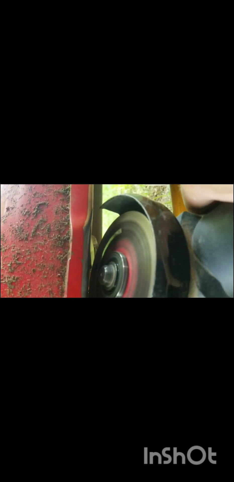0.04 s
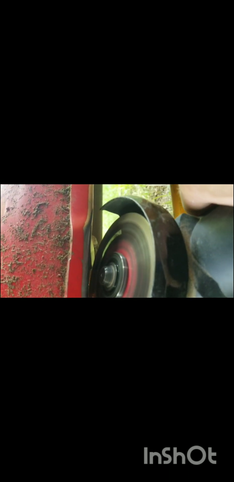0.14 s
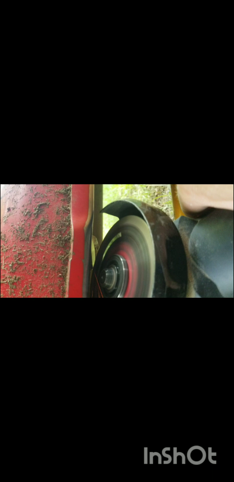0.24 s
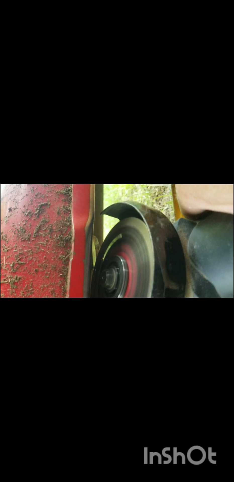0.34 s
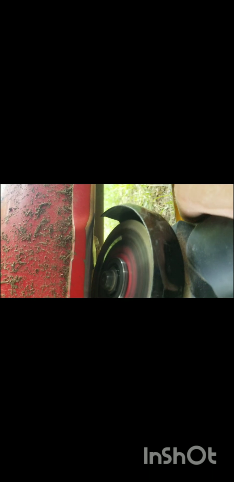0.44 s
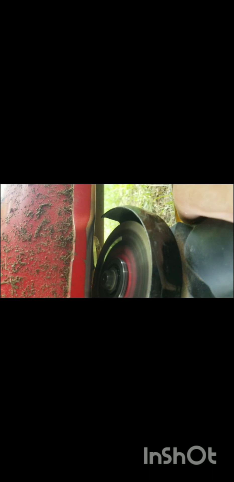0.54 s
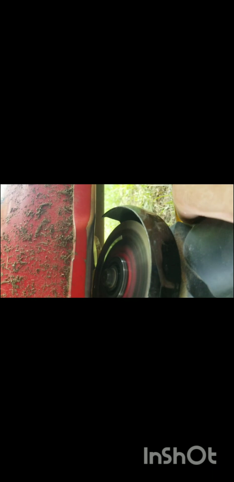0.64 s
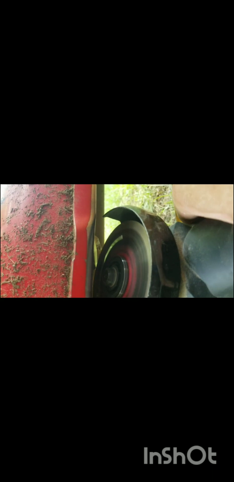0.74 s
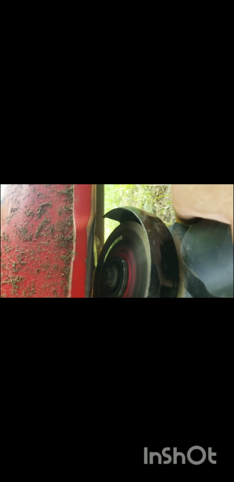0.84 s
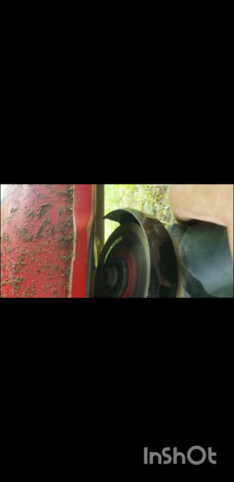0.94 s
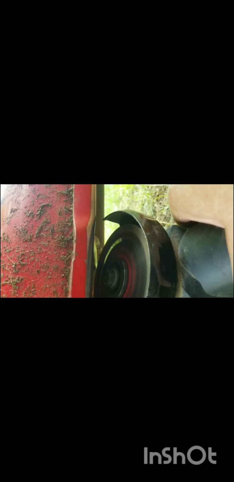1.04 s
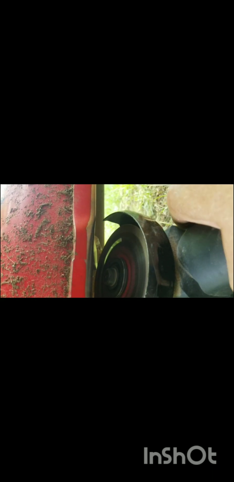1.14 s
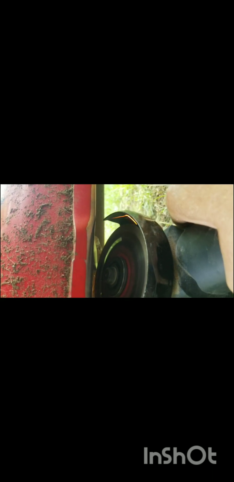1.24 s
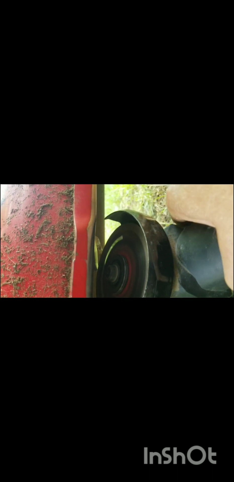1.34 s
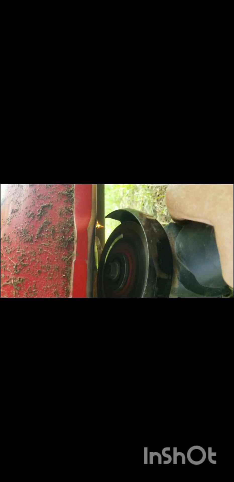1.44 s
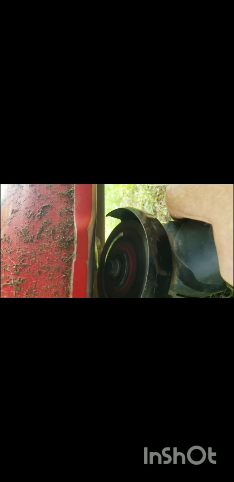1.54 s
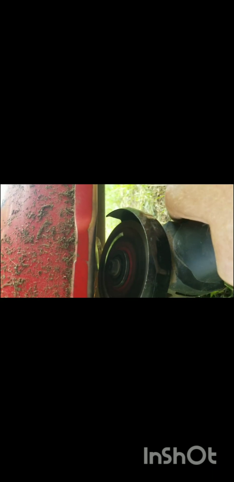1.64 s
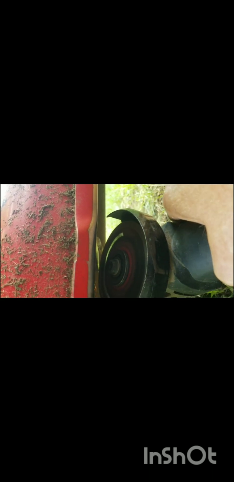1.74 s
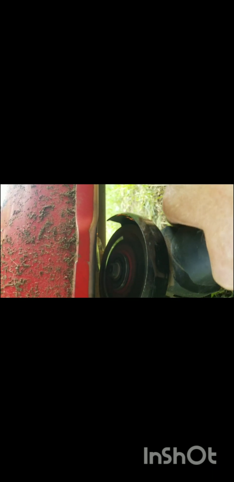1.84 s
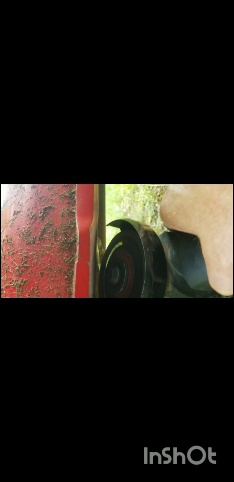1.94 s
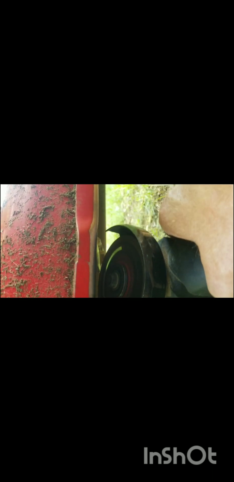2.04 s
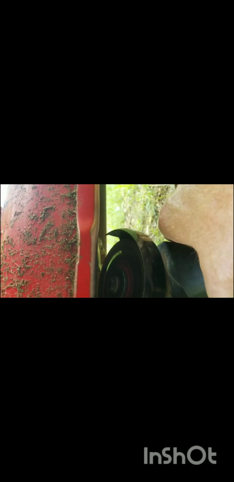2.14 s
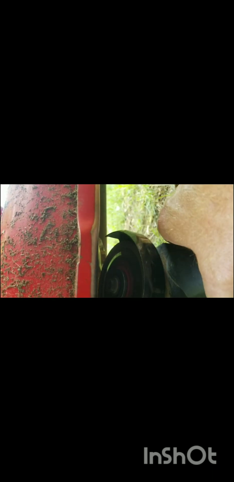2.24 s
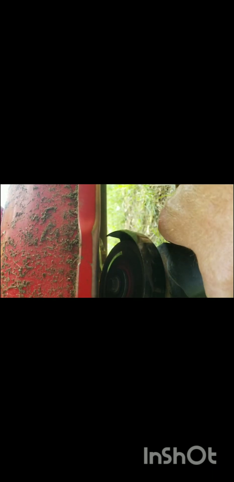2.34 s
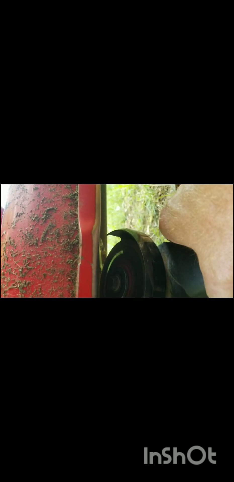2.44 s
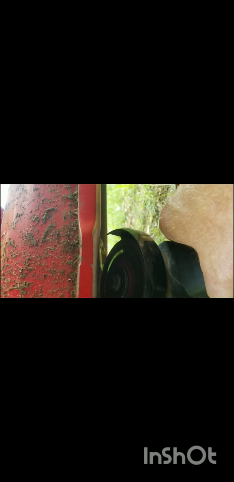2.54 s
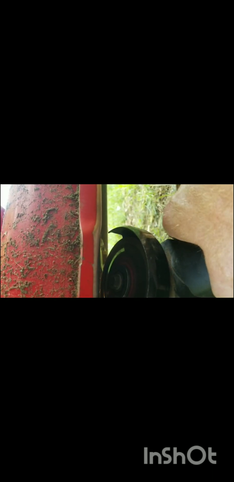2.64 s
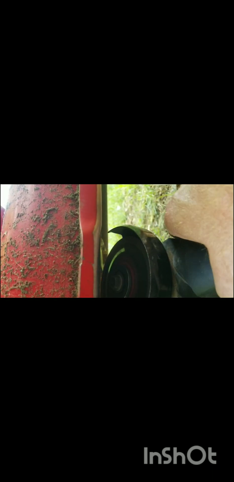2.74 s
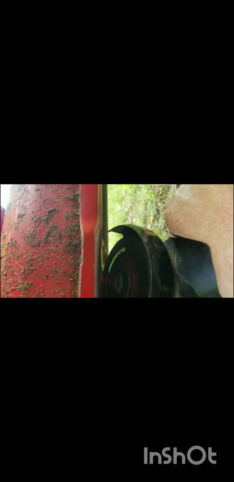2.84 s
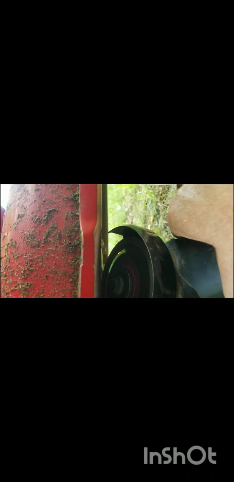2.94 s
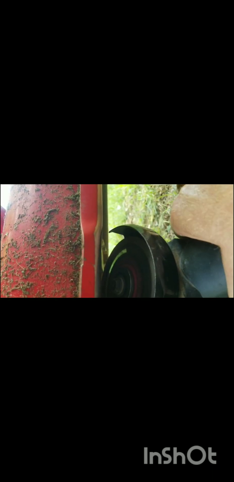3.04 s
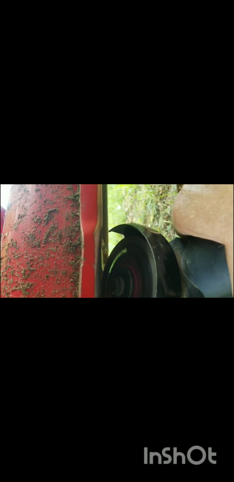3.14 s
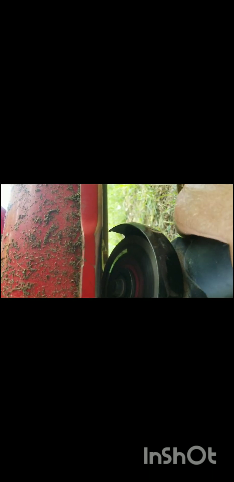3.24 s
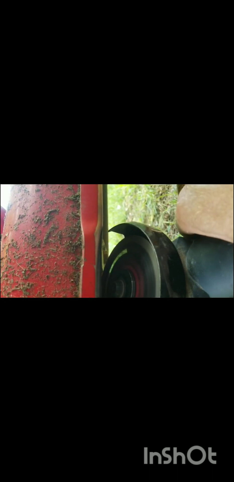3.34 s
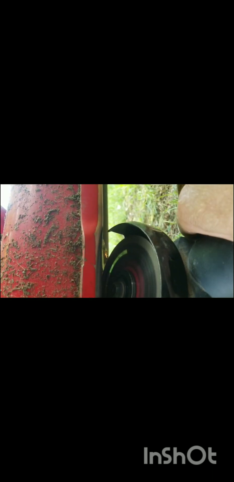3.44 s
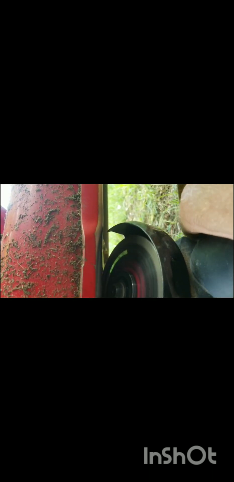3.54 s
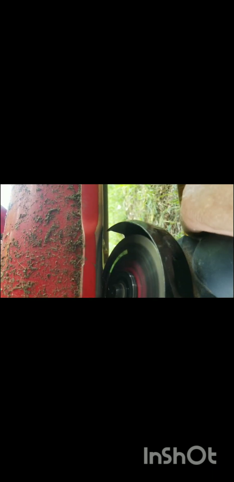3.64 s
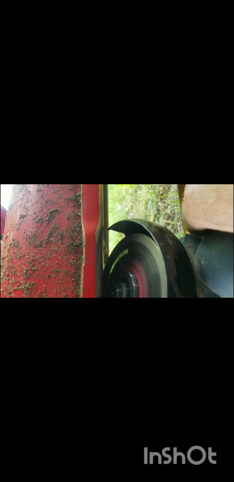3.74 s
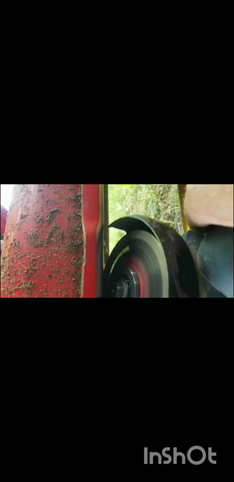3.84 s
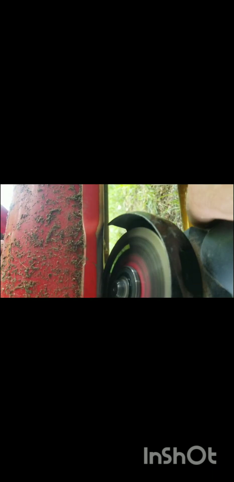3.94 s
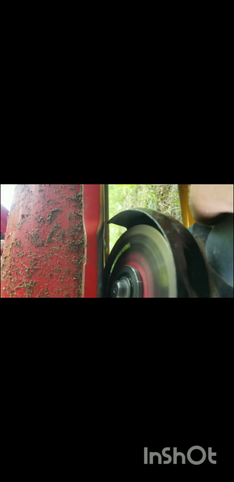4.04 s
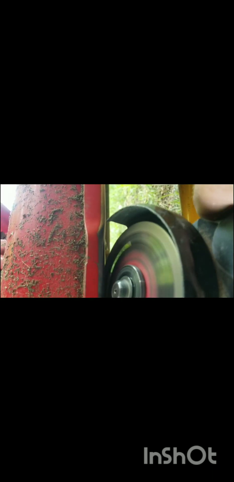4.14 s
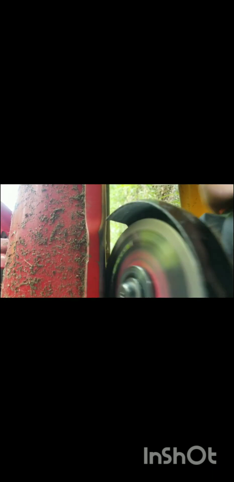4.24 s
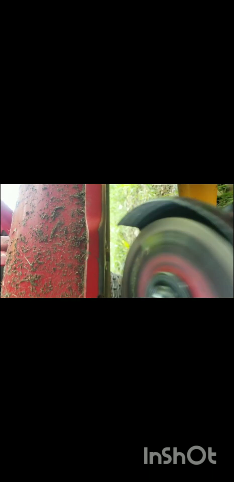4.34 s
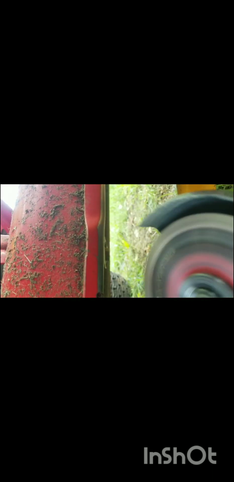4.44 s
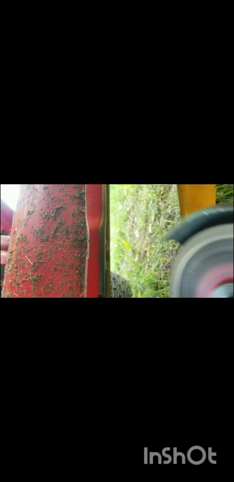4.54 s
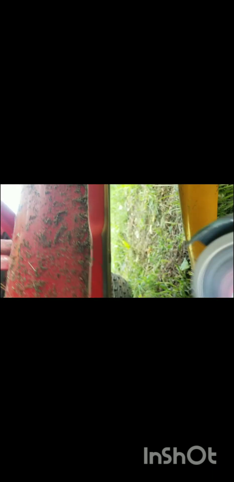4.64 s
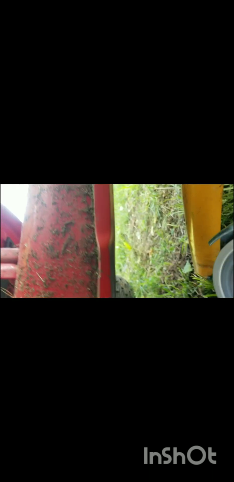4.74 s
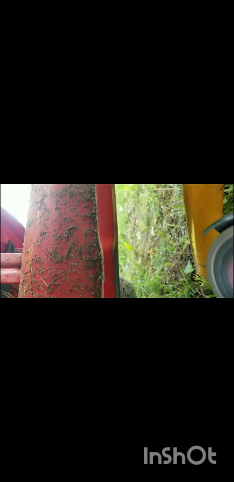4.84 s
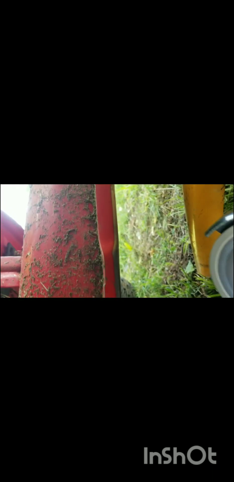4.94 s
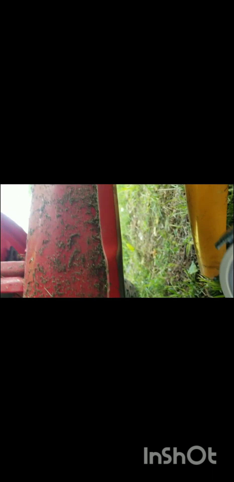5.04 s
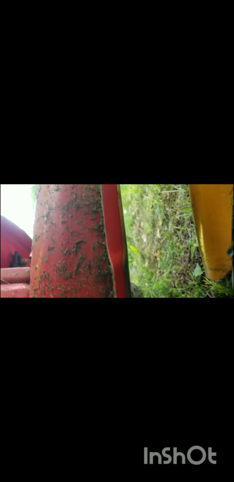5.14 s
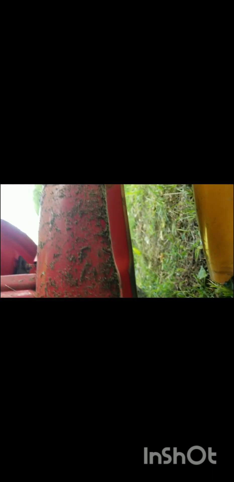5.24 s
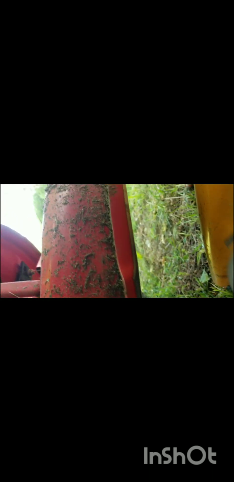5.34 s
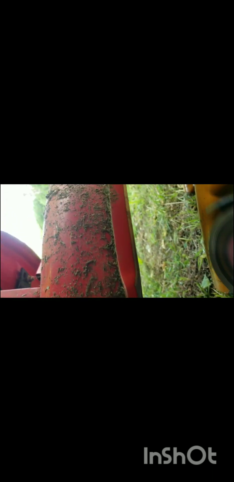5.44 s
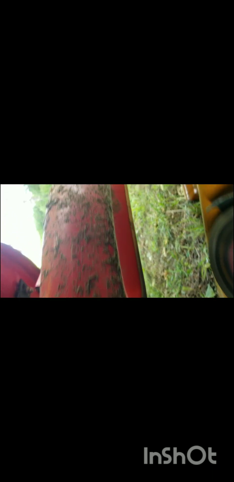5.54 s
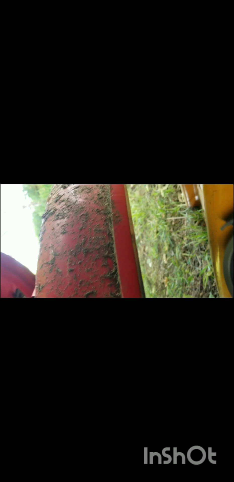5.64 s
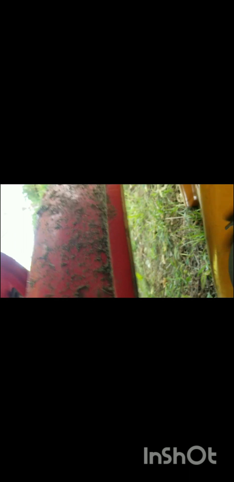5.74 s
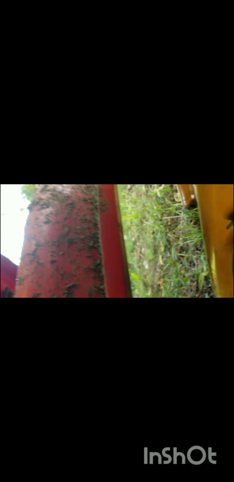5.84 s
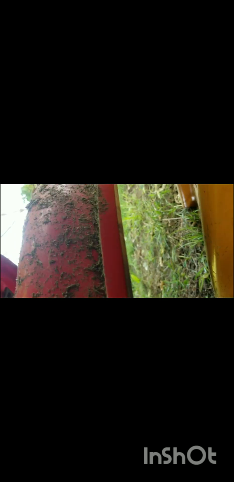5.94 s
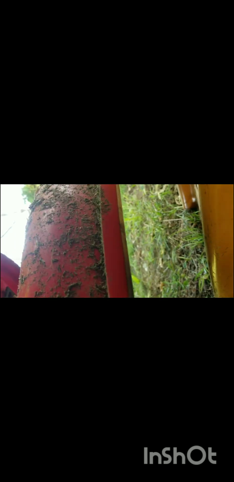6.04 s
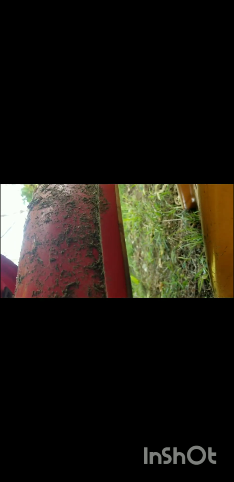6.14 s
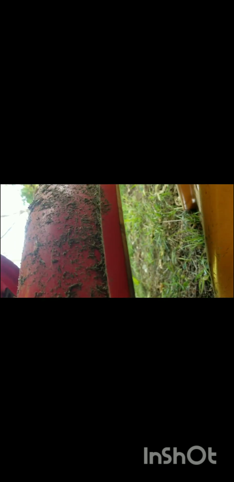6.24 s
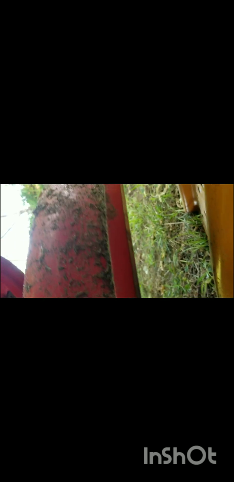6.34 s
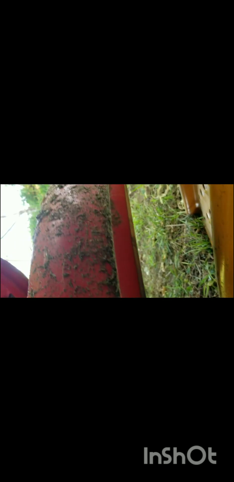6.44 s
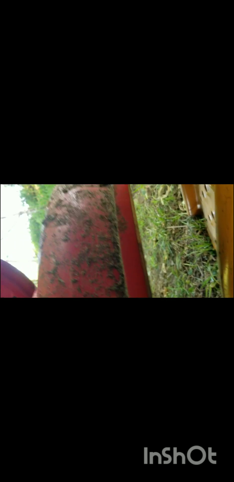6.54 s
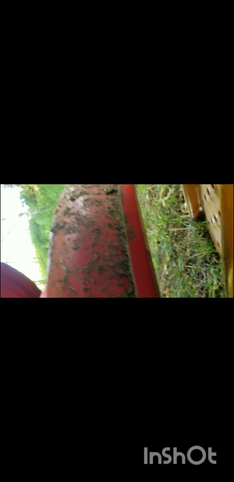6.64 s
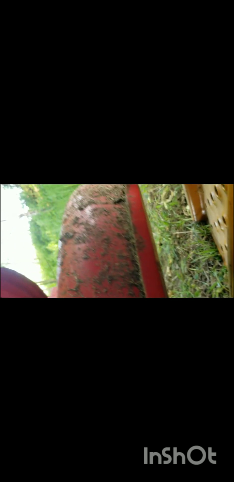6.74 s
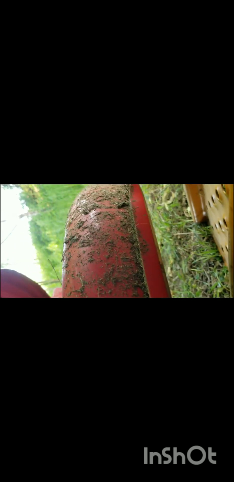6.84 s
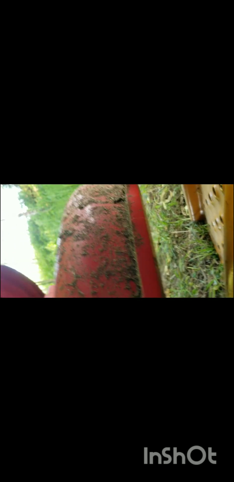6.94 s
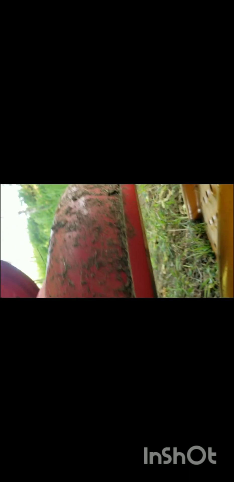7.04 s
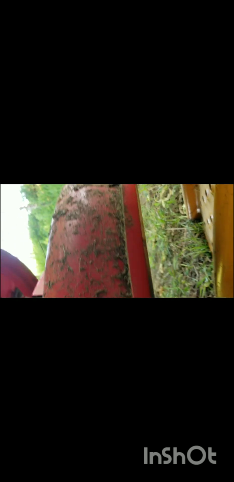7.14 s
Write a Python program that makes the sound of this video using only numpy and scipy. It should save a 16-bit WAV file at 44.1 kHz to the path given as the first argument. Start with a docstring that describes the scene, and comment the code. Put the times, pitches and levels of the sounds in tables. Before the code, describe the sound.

Close, wide stereo sound outdoors over a very faint low rumble. From 0 to about 1.8 s an angle grinder scrapes a steel edge: a coarse, noisy roar broken by rapid hops, low knocks and a buzzing chatter, with dense high metallic ringing and a brief squeal near 0.9 s. From 1.9 to 2.5 s the pressure lightens and the roar drops. Around 2.6 s it bites again, with hollow tones from the guard and a thin, unsteady high whistle until lift-off; loudest and most continuous near 3.3-3.7 s, with a piercing squeal at 3.5 s. At 4.07 s the disc leaves and the steel rings away quickly. The motor whines freely with fan hiss and light gear rattles. From 5.07 s it coasts down in pitch, a soft thud at 5.5 s, knocks growing loud and irregular, still turning at about half speed at 7.2 s.

```python
"""An angle grinder cuts a steel edge: filtered noise grains roar while the disc hops and chatters, modes of the
steel ring and squeal, and under heavy load the disc whistles. At lift-off the blade modes decay freely;
the motor goes on as armature and spindle sines with fan noise, and slack gears knock in a resonant housing.
The switch is let go and friction and fan drag slow the shaft to about half speed amid louder rattling, with
one soft thud. Faint outdoor rumble, shaped from noise, lies under everything."""
import sys
import numpy as np
from scipy import signal
from scipy.fft import rfft, irfft
from scipy.io import wavfile
from scipy.ndimage import uniform_filter1d

SR = 44100
rng = np.random.default_rng(int(sys.argv[2]) if len(sys.argv) > 2 else 0)


def unload_audio(sound):
    """Save the sound as a 16-bit wav file, at the path given as the first command line argument."""
    columns = np.transpose(np.atleast_2d(sound))
    # keep every value between -1 and 1, then stretch to whole-number steps
    steps = np.round(np.clip(columns, -1, 1) * 32767)
    wavfile.write(sys.argv[1], SR, steps.astype(np.int16))


N = 317520
T = np.arange(N) / SR  # time [s]
LIFT_S = 4.072  # the disc leaves the steel
GEAR_RATIO = 3.11  # armature turns per spindle turn
PORT_LAG_S = 0.000285  # delay of the left port behind the right


def undb(db):
    """Convert a level in dB to an amplitude ratio."""
    return 10 ** (np.asarray(db) / 20)


def unit(x):
    """Normalise to unit rms, so that later gains set the level."""
    return x / np.sqrt(np.mean(x ** 2))


def curves(table):
    """Interpolate each column linearly in time."""
    s, *columns = np.transpose(table)
    return [np.interp(T, s, c) for c in columns]


def colour(x, points, sign=1, lag_s=0):
    """Linear filtering in the spectrum: (Hz, dB) points joined on a log axis; linear phase gives a delay."""
    hz = np.arange(N // 2 + 1) * SR / N + 1e-3
    f, db = np.transpose(points)
    gain = undb(sign * np.interp(np.log(hz), np.log(f), db))
    delay = np.exp(-2j * np.pi * hz * lag_s)
    return irfft(rfft(x) * gain * delay, N)


def walk(rate):
    """Slow random modulation: levels held 1 / rate s and smoothed twice, with a spread near 1."""
    k = int(SR / rate)
    held = np.repeat(rng.standard_normal(N // k + 1), k)
    return 1.05 * uniform_filter1d(uniform_filter1d(held, k), k)[:N]


def ring(x, modes, state, sway_db, rate):
    """Modal superposition: parallel resonators whose drive follows a state and chance."""
    total = 0
    for hz, width_hz, db, slope_db in modes:
        drive = x * undb(slope_db * state + sway_db * walk(rate))
        b, a = signal.iirpeak(hz, hz / width_hz, SR)
        total = total + undb(db) * signal.lfilter(b, a, drive)
    return unit(total)


def grit(scatter_db, grain_hz):
    """Granular excitation: white noise in short grains of uneven strength."""
    k = int(SR / grain_hz)
    grain_db = scatter_db * np.minimum(rng.exponential(size=N // k + 1), 3)
    return unit(np.repeat(undb(grain_db), k)[:N] * rng.standard_normal(N))


def blows(runs):
    """Repeated impact: one row (s, peak dB, other columns) per blow, slightly uneven inside a run."""
    chance = rng.standard_normal((len(runs), 16, 2))
    rows = []
    for (s, n, step, db, *rest), c in zip(runs, chance):
        for k in range(round(n)):
            time = s + k * step + .002 * c[k, 0] * (k > 0)  # scatter [s]
            level = db + 1.5 * c[k, 1] * (n > 1.5)  # scatter [dB]
            rows.append((time, level, *rest))
    return rows


def bursts(events, rise_s, length_s):
    """Impact energy: the powers of the blows add, each with a quick rise and rounded fall."""
    out = np.zeros(N)
    for (s, db), length in zip(events, np.broadcast_to(length_s, len(events))):
        i = int(s * SR)
        t = T[:min(N - i, SR // 10)]
        out[i:i + len(t)] += undb(2 * db) * (1 - np.exp(-t / rise_s)) * np.exp(-(t / length) ** 2)
    return out


def breaks(events, lead_s, half_s):
    """Intermittent contact: the gain sinks as parts separate before a blow and returns faster as they meet."""
    loss_db = 0
    for s, db in events:
        if db > 0:
            width_s = np.where(T < s - lead_s, half_s, 0.45 * half_s)
            loss_db = loss_db + db * np.exp(-((T - s + lead_s) / width_s) ** 2)
    return undb(-loss_db)


def ports(left, other, lag_s):
    """Interaural-like difference: the right port hears earlier, with shading and partly by other paths."""
    # attenuation of the tool at the right port, scaled by 1.19 below: (frequency [Hz], attenuation [dB])
    shadow = [(300, -0.5), (600, 0), (1000, 2.5), (1500, 1), (2000, 2), (3000, 6), (4500, 9), (6000, 9.5),
              (7000, 8.5), (8000, 26), (9000, -3.5), (11000, 3), (13500, -0.5), (15500, 32)]
    alike = .6  # correlation of the two paths before filtering
    mixed = alike * left + np.sqrt(1 - alike ** 2) * other
    return np.array([colour(left, [(1, 0), (2, 0.018)], lag_s=lag_s), colour(mixed, shadow, sign=-1.19)])


def surroundings():
    """Broadband ambience at each port, and a damped low resonance as the tool touches something soft."""
    # outdoor spectrum: (frequency [Hz], relative spectral level [dB])
    outdoors = [(15, -30), (40, -10), (90, -6), (200, -12), (500, -23)]
    t = np.maximum(T - 5.489, 0)  # time since the thud [s]
    thud = signal.lfilter(*signal.iirpeak(250, .8, SR), rng.standard_normal(N))
    thud = thud * (t > 0) * np.exp(-t / 0.0079)
    rumble = [unit(colour(rng.standard_normal(N), outdoors)) * undb(-57.5 + 2.0 * walk(3.3)) for _ in range(2)]
    return np.array(rumble) + thud / abs(thud).max() * undb([[-28], [-32]])


def speed():
    """Rotational dynamics: a driven rate that sags under load, then a coast against friction and fan drag."""
    # armature while the switch is held: (time [s], turn rate [Hz])
    driven = [(0.06, 566), (.7, 558), (1.5, 557), (2.4, 562.5), (3.2, 549), (3.6, 545), (4.05, 549),
              (4.3, 558), (4.8, 567.3), (5.07, 570.7)]
    off_s = 5.07
    # coasting loss each second [Hz/s] = friction + drag * rate ** 2, with drag in [1/(Hz s)]
    friction, drag = 53.7, 4.413e-4
    even = np.sqrt(friction / drag)  # rate at which the two losses are equal [Hz]
    coast = even * drag * np.maximum(T - off_s, 0)
    return even * np.tan(np.arctan(curves(driven)[0] / even) - coast)


def motor(hz, turns):
    """Periodic rotor forces hum at the armature and spindle rates; turbulence of the fan hisses."""
    # harmonics at full speed: (multiple of the armature rate, relative level [dB])
    harmonics = [(1, 0), (2, -9)]
    # spindle hum, on the same scale as the harmonics: (time [s], relative level [dB])
    spindle_level = [(0, -14), (4.1, -19.5), (4.5, -18), (5.5, -24), (5.9, -15), (6.3, -18), (7.2, -29)]
    # gain of the whole hum, before its sway and port gains: (time [s], level [dB])
    hum_level = [(0, -47), (2.4, -52.5), (3.2, -51), (4.05, -43), (4.15, -35.5), (4.9, -38), (5.3, -37.5),
                 (6, -34.5), (6.6, -41.5), (7.2, -45.5)]
    # cooling fan before its sway and the ports: (time [s], level [dB])
    fan_level = [(0, -31), (2.5, -34), (4, -31.5), (4.3, -25.5), (6.3, -26), (7.2, -44)]
    # fan noise spectrum: (frequency [Hz], relative spectral level [dB])
    fan_air = [(30, -40), (100, -11.5), (300, -10), (600, -3), (1100, 5), (1500, 0), (2500, 4), (3000, 7),
               (5500, 3), (7800, 5.5), (8500, -6), (15700, -0.5)]
    slowing = np.log2(hz.max() / hz)  # octaves below top speed
    hum = sum(undb(db - 4.2 * (k - 1) * slowing) * np.sin(k * turns) for k, db in harmonics)
    hum = hum + undb(curves(spindle_level)[0]) * np.sin(turns / GEAR_RATIO)
    hum = hum * undb(curves(hum_level)[0] + 1.0 * walk(12))
    air = []
    for _ in range(2):
        level_db = curves(fan_level)[0] + 1.44 * walk(25.17)
        air.append(unit(colour(rng.standard_normal(N), fan_air)) * undb(level_db))
    return ports(*air, PORT_LAG_S) + hum * undb([[-6], [0]])


def gears(hz):
    """Backlash impacts: loose teeth clatter and knock across their slack, exciting modes of the housing."""
    # knocks in runs: (first knock [s], knocks, spacing [s], relative peak [dB], gap before [dB])
    rattles = [(4.121, 2, .042, -27, -2), (4.2136, 3, .032, -23.5, 4), (4.312, 3, .0195, -24, -3),
               (4.386, 4, .0353, -22.5, -3), (4.527, 3, .0355, -21.5, -5), (4.656, 2, .034, -20.5, -2),
               (4.729, 2, .032, -23, -3.5), (4.82, 1, 0, -19.5, 2), (4.857, 3, .032, -26, 8),
               (4.963, 4, .0335, -25.5, 13), (5.084, 2, .063, -20, -5), (5.202, 4, .04, -21.5, 6),
               (5.387, 2, .025, -26, -5), (5.481, 4, .042, -18, 2), (5.644, 2, .037, -12, 7.5),
               (5.739, 1, 0, -13, 2), (5.788, 2, .039, -12.5, 7), (5.872, 4, .0445, -13.5, 0.5),
               (6.062, 2, .031, -15, 1), (6.155, 1, 0, -12.5, -2), (6.2, 1, 0, -14, 7),
               (6.234, 3, .032, -14, 6), (6.33, 3, .043, -16.5, 4), (6.45, 1, 0, -21, 2),
               (6.495, 1, 0, -11.5, 8), (6.543, 1, 0, -21, 28), (6.556, 1, 0, -14, 4),
               (6.612, 1, 0, -21, 15), (6.627, 1, 0, -14, 1), (6.673, 1, 0, -16.5, 18),
               (6.728, 1, 0, -22, 5), (6.788, 1, 0, -18.5, 2.5), (6.828, 1, 0, -20, 15),
               (6.845, 1, 0, -15, 0), (6.879, 1, 0, -13.5, 20), (6.924, 1, 0, -31, 10),
               (6.966, 1, 0, -26, 12), (7.024, 1, 0, -14.5, 12.5), (7.062, 2, .042, -22, 2.5),
               (7.146, 1, 0, -21, 4), (7.189, 1, 0, -16, 8)]
    # steady force between the knocks, before its sway: (time [s], relative level [dB])
    clatter = [(4.1, -36), (5.04, -38), (5.09, -25), (5.26, -21.5), (5.46, -17.5), (6.3, -18), (7.2, -19)]
    # direct gearbox noise: (frequency [Hz], relative spectral level [dB])
    gearbox = [(88, -51), (150, -23), (542, -34.5), (831, -9), (934, -10), (1460, -11), (1610, 0),
               (2120, -1), (3180, -6.5), (7950, -6.5), (8760, -12), (14500, -7), (15700, 0.5)]
    # housing modes: (frequency [Hz], width [Hz], level [dB], drive change per halving of shaft speed [dB])
    housing = [(831.6, 11, 1.5, 3.5), (1665, 16, 7.5, -15), (1882, 44, -8.5, 17.5), (2510, 330, -6, 2),
               (2960, 49, 5, -1), (3270, 176, 2, 2), (3676, 95, 6, -2.5), (4030, 150, 7, -14),
               (4470, 190, 8, -7.5), (5050, 250, 6, -0.5), (6100, 72, -7, -5), (7750, 160, 5, -6),
               (11360, 160, -3, -6), (14100, 160, -1, 0), (14300, 81, 5, -18)]
    # gain at the centre of three bands: (time [s], top [dB], upper [dB], lower [dB])
    band_gains = [(4.1, 2, -1, 6), (5.05, -4, -1.5, 1.5), (5.3, -15, 3, 0), (5.6, 0.5, 0.5, -2),
                  (6.25, 0.5, 2.5, 0), (6.55, 0, 0.5, 1.5), (6.8, -11, 4.5, 5.5), (7.2, -9, 1.5, -8.5)]
    # those bands, in the same order: (frequency [Hz], Q)
    bands = [(5060, 23), (4330, 4.6), (1820, 4.9)]
    free = np.clip((T - LIFT_S) / .02 + 1, 0, 1)
    steady = undb(2 * (curves(clatter)[0] + 2.0 * walk(60)))
    knocks = np.array(blows(rattles))
    knock_s = 3.43 / np.interp(knocks[:, 0], T, hz)  # a knock lasts a few armature turns
    impact = bursts(knocks[:, [0, 1]], rise_s=0.00041, length_s=knock_s)
    force = np.sqrt(steady + impact) * free
    force = force * breaks(knocks[:, [0, 2]], lead_s=0.01, half_s=0.0093)
    slowing = np.log2(hz.max() / hz)
    paths = []
    for _ in range(2):
        teeth = grit(3.74, 2000.) * force
        direct = unit(colour(teeth, gearbox))
        body = 0.78 * direct + 0.68 * ring(teeth, housing, slowing, sway_db=2.0, rate=22.)
        body = body + sum((undb(db) - 1) * signal.lfilter(*signal.iirpeak(f, q, SR), body)
                          for (f, q), db in zip(bands, curves(band_gains)))
        paths.append(undb(0.5) * body * np.std(teeth))
    return ports(*paths, PORT_LAG_S)


def ring_out():
    """Free decay: the last kick of the disc leaves the blade modes to fade exponentially."""
    # blade modes: (frequency [Hz], relative level [dB], time to fall by 60 dB [s])
    farewell = [(4344, -7, .4), (4474, 0, .2), (4753, -3, .4), (5103, -6, .4), (6611, -8, .2),
                (11100, -2, .12), (11900, -10, .25), (12790, -8, .2)]
    t = np.maximum(T - LIFT_S + .015, 0)
    start = rng.uniform(0, 2 * np.pi, len(farewell))
    tones = sum(undb(db - 60 * t / t60) * np.sin(2 * np.pi * hz * t + p)
                for (hz, db, t60), p in zip(farewell, start))
    return tones * (1 - np.exp(-t / 0.0047)) * undb([[-24.5], [-34.5]])


def whistle(spindle):
    """Amplitude modulation: the loaded disc's unsteady tone has a side line each way at the spindle rate."""
    # tone before its sway and modulation: (time [s], frequency [Hz], level [dB])
    tone_course = [(2.6, 7506, -38), (2.75, 7490, -28), (3.05, 7485, -31), (3.2, 7468, -21),
                   (3.5, 7427, -22), (4.07, 7451, -26)]
    hz, db = curves(tone_course)
    on = np.clip((T - tone_course[0][0]) / .05, 0, 1) * np.clip((LIFT_S - T) / .02, 0, 1)
    tone = np.sin(2 * np.pi * np.cumsum(hz) / SR + 0.34 * walk(60))
    return tone * (1 + .5 * np.cos(spindle)) * on * undb(db + 2.0 * walk(24.8))


def squealing(touch):
    """Narrow-band resonance: noise in two sharp steel modes, heard in short spells."""
    # squeal modes: (frequency [Hz], width [Hz], relative level [dB], drive slope [dB], zero here)
    squeal_modes = [(14326, 14, 0, 0), (14150, 14, -5, 0)]
    # spells: (centre [s], half length [s], level [dB])
    spells = [(0, .05, -28), (0.887, .08, -32), (3.514, 0.13, -21), (4.0, .05, -34)]
    tone = ring(rng.standard_normal(N) * touch, squeal_modes, 0, sway_db=3.0, rate=5.5)
    return tone * sum(undb(db) * np.exp(-((T - s) / half) ** 4) for s, half, db in spells)


def steel_ringing(load, ring_db):
    """Forced modal vibration: each blade mode swells and fades in its own slow cycle during the cut."""
    # blade modes: (frequency [Hz], relative level [dB], swing [dB], cycles during the cut,
    # part of the cut with strongest ringing [0-1 from start to lift-off])
    blade = [(4005, -16, 7, 1, 0.55), (4759, -15.9, 5.4, 2.0, 0.34), (5350, -13.5, 5, 0.8, 0.1),
             (5448, -14, 3.6, 2.7, 0.16), (6090, -12, 5.9, 2.1, 0.1), (6245, -13.4, 4.3, 1.3, 0.46),
             (6395, -12.7, 2.0, 1.2, 0.12), (7450, -11.5, 7, 0.7, 1.05), (7860, -2.9, 6.5, 0.7, 0.31),
             (7957, -8.2, 3.7, 2.8, 0.24), (8247, -14.4, 5.8, 1.7, 0.54), (8775, -16.6, 4.4, 1.2, 0.43),
             (9335, -8.9, 2.0, 2.3, 0.18), (9755, -9.8, 5.7, 1.1, 0.3), (9841, -9.1, 7, 0.5, 0.35),
             (10842, -14.5, 2.0, 1.6, 0.06), (11100, -11.9, 2.2, 3.0, 0.09), (11639, -4.8, 1.4, 2.4, 0.27),
             (11854, -6.1, 3.1, 0.8, 0.78), (12199, -3.8, 3.0, 1.7, 0.42), (12478, -8.4, 4.4, 1.5, 0.55),
             (12801, -5, 4.2, 3.0, 0.19), (12952, -10, 2.0, 1.3, 0.52), (14147, -4.8, 4.0, 1.6, 0.3),
             (14330, 0, 4.6, 2.9, 0.21), (14632, -7.1, 7, 0.5, 0.45), (14923, -2.9, 2.9, 1.9, 0.03),
             (15248, -6.2, 3.3, 1.4, 0.5)]
    progress = np.clip(T / LIFT_S, 0, 1)  # steady progress of the mode pattern during the cut
    modes = []
    for hz, db, swing_db, cycles, strongest in blade:
        width_hz = hz / 336 + 7  # the touching disc adds damping [Hz]
        swell_db = swing_db * np.cos(2 * np.pi * cycles * (progress - strongest))
        modes.append((hz, width_hz, db, swell_db))
    drive = load * undb(ring_db)
    return [undb(-19.5) * ring(grit(1.4, 3000.) * drive, modes, 1, sway_db=2.5, rate=8.) for _ in range(2)]


def guard_tone(press):
    """Forced resonance: the contact noise excites the hollow tone of the guard."""
    # level against the spread of the contact pressure: (time [s], level [dB])
    guard_level = [(0, -10), (1, -3), (1.4, -14), (2.45, -8), (2.54, -5), (2.61, 2), (2.66, -7.5), (2.8, 3),
                   (3, -13), (3.5, -20), (4.06, -15)]
    # guard modes: (frequency [Hz], width [Hz], relative level [dB], drive slope [dB], zero here)
    guard_modes = [(1755, 230, 3.5, 0), (2010, 180, -4, 0)]
    tone = ring(grit(4.4, 1000.) * press, guard_modes, 0, sway_db=2.5, rate=7.7)
    return tone * np.std(press) * undb(curves(guard_level)[0])


def grinding(spindle):
    """Frictional excitation: grit under fluctuating pressure roars at the left port and rings the steel."""
    # contact, before the mix gains: (time [s], roar [dB], rumble over roar [dB], ring drive and sparks [dB],
    # chatter depth [0-1], ring at the right port over the left before shading [dB])
    contact = [(0, -22.5, -12.5, -22.5, 0.22, -1.5), (.5, -22, -8.5, -24, 0.35, -2),
               (.9, -21, -3.5, -25, 0.43, -0.5), (1.2, -25.5, -9, -25, 0.14, -2.5),
               (1.5, -22, -11, -26, 0.3, 1), (1.85, -27.5, -10.5, -27, .15, 0.5),
               (2.1, -33, -13, -30, 0.43, -4), (2.44, -32.5, -13.5, -27, 0, -3),
               (2.58, -23, -6, -26.5, 0.15, -0.5), (3.1, -21, -6.5, -23, 0.23, 0),
               (3.36, -19.5, 2, -25.5, 0, 2.5), (3.6, -19, -6, -24.5, 0.03, 1),
               (4.06, -22, -5, -25.5, 0, -1.5)]
    # hops, levels before the mix:
    # (first landing [s], landings, spacing [s], peak [dB], gap before [dB], low knock [dB])
    bounces = [(.021, 5, 0.034, -21, 4, -25), (.17, 1, 0, -37, -2, -15.5), (.274, 3, .045, -20, 1, -18),
               (.436, 1, 0, -25, 3, -21), (.484, 1, 0, -18, 12, -25), (.53, 3, 0.041, -21.5, 3, -20),
               (.656, 1, 0, -18.5, 6, -13.5), (.702, 4, 0.039, -21, 4.5, -24), (.868, 1, 0, -15.5, 3, -20),
               (.91, 5, .044, -20, 6, -29), (1.124, 5, .0375, -18, 4, -31), (1.318, 1, 0, -16.5, 11, -22),
               (1.351, 2, .034, -15.5, 11, -17), (1.432, 4, 0.037, -17.5, 7, -27),
               (1.578, 6, .0385, -18.5, 10.5, -19), (1.812, 2, .0405, -17.5, 18, -19),
               (1.886, 2, .035, -20, 7, -43), (1.957, 1, 0, -20, 6, -32), (1.993, 1, 0, -24.5, 3, -36),
               (2.04, 1, 0, -27, 21, -40), (2.052, 1, 0, -29, 0, -36), (2.089, 1, 0, -34, 25, -33),
               (2.119, 1, 0, -33, 5, -45), (2.145, 2, 0.036, -26.5, 13, -35), (2.213, 1, 0, -28, 2, -45),
               (2.287, 2, 0.035, -30, 10, -33), (2.361, 1, 0, -41, 11, -44), (2.42, 1, 0, -21, -4, -38),
               (2.466, 2, 0.028, -21.5, 10, -41), (2.537, 2, 0.054, -19, 0, -25),
               (2.644, 1, 0, -21, 7, -14.5), (2.72, 2, 0.04, -21, 2, -33), (2.854, 1, 0, -17, -27, -17),
               (2.947, 2, .023, -14.5, 3.5, -19), (2.997, 1, 0, -17, 11, -26),
               (3.04, 2, 0.053, -22, 3.5, -15.5), (3.228, 2, 0.047, -15, -2, -12),
               (3.405, 1, 0, -14, -3, -30), (3.684, 1, 0, -16.5, -8, -15), (3.833, 1, 0, -15, 1, -32),
               (3.935, 2, 0.02, -15.5, -23, -26), (4.028, 1, 0, -19, 3.5, -16)]
    # roar spectrum: (frequency [Hz], relative spectral level [dB])
    roar_air = [(180, -9), (300, -8), (1500, -3), (2050, -3.5), (6210, -8.5), (7090, -15), (7700, -15.5),
                (8650, -20), (9090, -11), (11800, -12.5), (13500, -6.5), (14700, -9), (15700, -2.5)]
    # landings are duller than steady grinding: (frequency [Hz], gain [dB])
    hop_colour = [(2200, -0.5), (5000, -5)]
    # low rumble spectrum: (frequency [Hz], relative spectral level [dB])
    rumble_air = [(12, -44), (20, -16), (108, -0.5), (177, 0.5), (295, -4), (352, -3.5), (900, -11.5),
                  (1170, -74), (1980, -120)]
    # hiss of the cut: (frequency [Hz], relative spectral level [dB])
    spark_air = [(5000, -30), (8600, -20), (9200, -12), (10500, -8), (13500, -4), (15700, -5)]
    # attenuation of the ringing at the right port, scaled by 0.85 below: (frequency [Hz], attenuation [dB])
    steel_shade = [(2600, 8), (5300, 9.5), (6300, 13), (7600, 40), (8300, 3), (9600, 8), (12000, 4.5),
                   (13000, 31), (14300, 12), (15500, 24)]
    roar_db, rumble_db, ring_db, depth, far_db = curves(contact)
    hops = np.array(blows(bounces))
    touch = np.clip((LIFT_S - T) / .012, 0, 1)

    beat = 2 * np.pi * 77.47 * T + 0.89 * walk(5.29)  # chatter phase, 77.47 Hz with a slow wander
    chatter = 1 + np.clip(depth, 0, .95) * np.sin(beat)
    runout = 1 + 0.18 * np.cos(spindle)  # the disc is slightly out of true
    steady = undb(2 * roar_db)
    landing = bursts(hops[:, [0, 1]], rise_s=0.0016, length_s=.014)
    press = np.sqrt(steady + landing) * chatter * runout * touch
    press = press * breaks(hops[:, [0, 2]], lead_s=0.0032, half_s=.010)
    # the steel follows the blows more mildly
    load = (press / uniform_filter1d(press + 1e-6, SR // 5)) ** .5 * touch

    roar = unit(colour(grit(0.8, 1500.), roar_air)) * press
    roar = roar + (colour(roar, hop_colour) - roar) * landing / (landing + steady)
    knock = bursts(hops[:, [0, 3]], rise_s=0.0024, length_s=0.0095) * touch
    thump = np.sqrt((press * undb(rumble_db)) ** 2 + knock)
    rumble = [unit(colour(grit(4.16, 600.), rumble_air)) * thump for _ in range(2)]
    sparks = unit(colour(grit(2.0, 4000.), spark_air)) * load * undb(ring_db - 10)
    # the whole work piece throbs at the chatter rate
    shake = undb(-5.0) * np.clip(depth, 0, 1) * uniform_filter1d(press, SR // 20) * np.sin(beat)

    steel = steel_ringing(load, ring_db)
    near = steel[0] + squealing(touch) + whistle(spindle)
    alike = 0.73  # other parts of the blade face the right port
    far = alike * near + np.sqrt(1 - alike ** 2) * steel[1]
    left = guard_tone(press) + shake + undb(6.5) * roar + sparks + undb(-0.5) * rumble[0]
    left = left + colour(near, [(1, 0), (2, 0)], lag_s=0.0017)
    right = undb(-32.5) * rumble[1] + colour(far, steel_shade, sign=-0.85) * undb(far_db)
    return np.array([left, right])


def scene():
    """Superposition of sources; contact, motor and gears share one shaft speed."""
    hz = speed()
    turns = 2 * np.pi * np.cumsum(hz) / SR  # armature angle [rad]
    return surroundings() + motor(hz, turns) + gears(hz) + ring_out() + grinding(turns / GEAR_RATIO)


def record(dry):
    """Soft saturation rounds the loudest peaks, then a steep low-pass removes the top."""
    cut = signal.ellip(14, .2, 90, 15720, fs=SR, output="sos")  # band edge [Hz]
    return signal.sosfilt(cut, .93 * np.tanh(dry / .93))


dry = scene()
out = record(dry)
unload_audio(out)
```